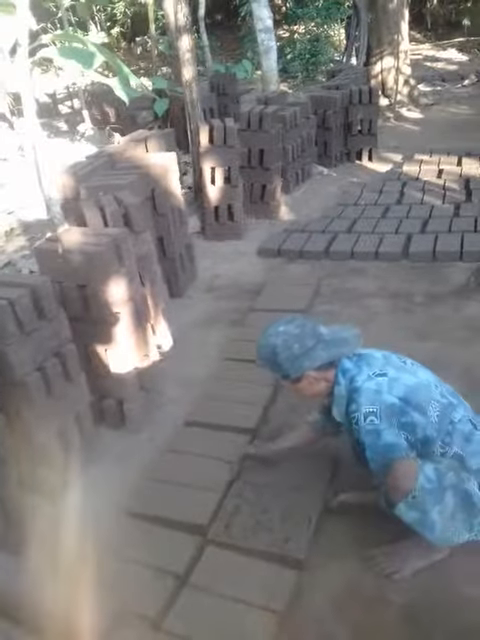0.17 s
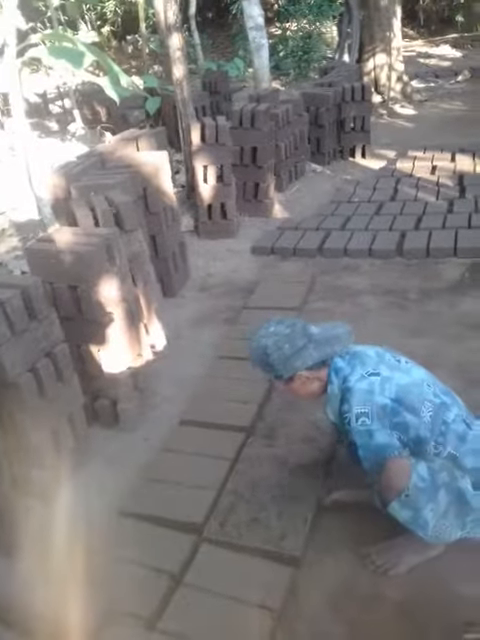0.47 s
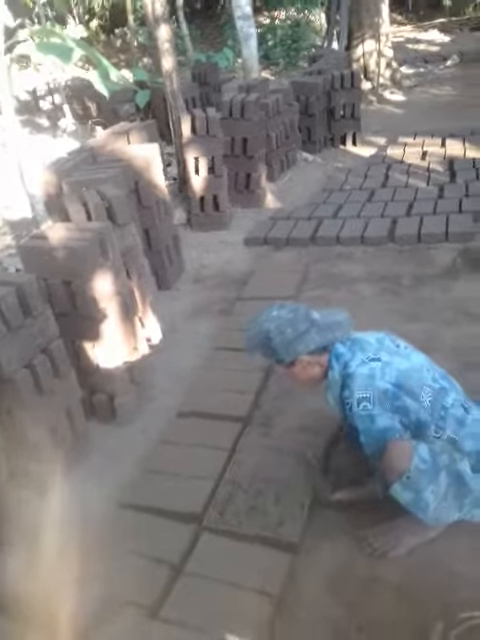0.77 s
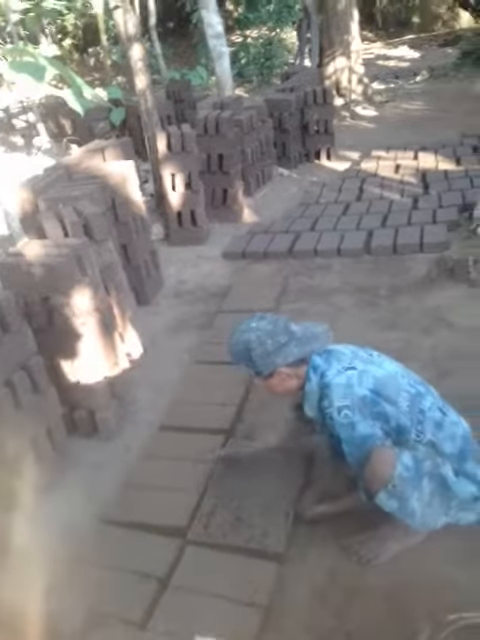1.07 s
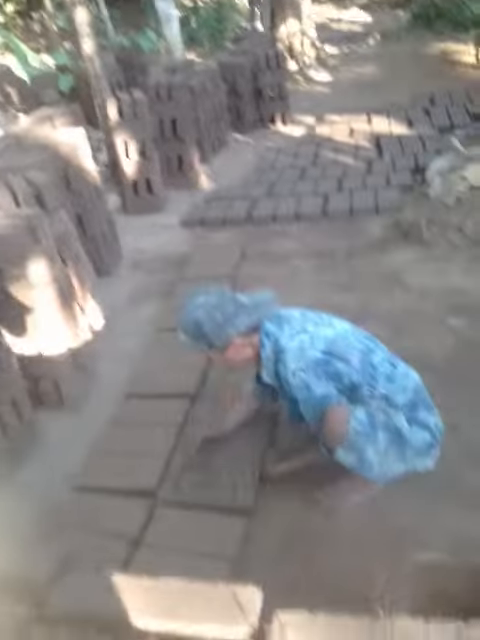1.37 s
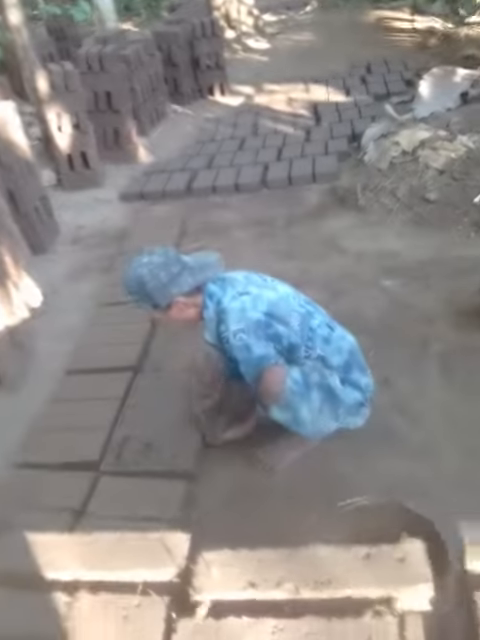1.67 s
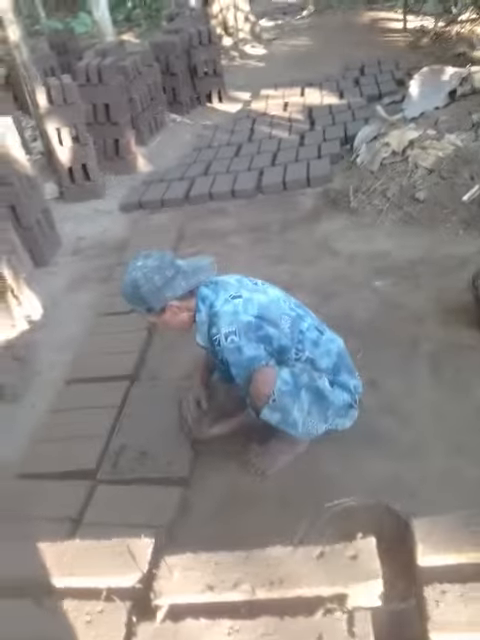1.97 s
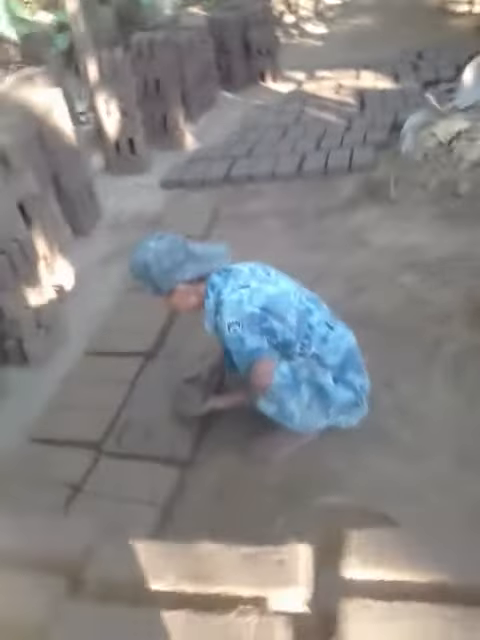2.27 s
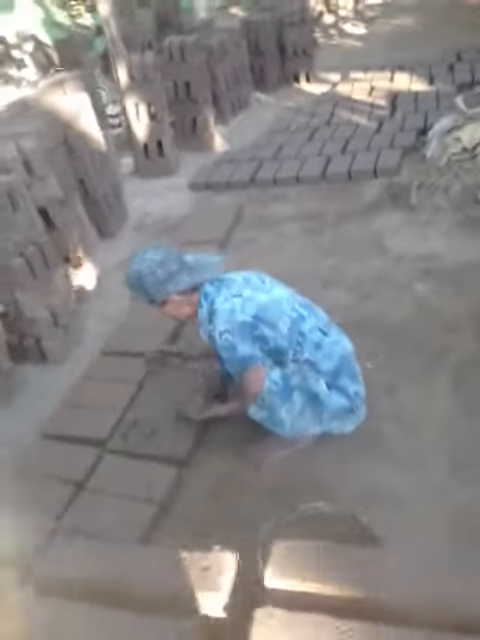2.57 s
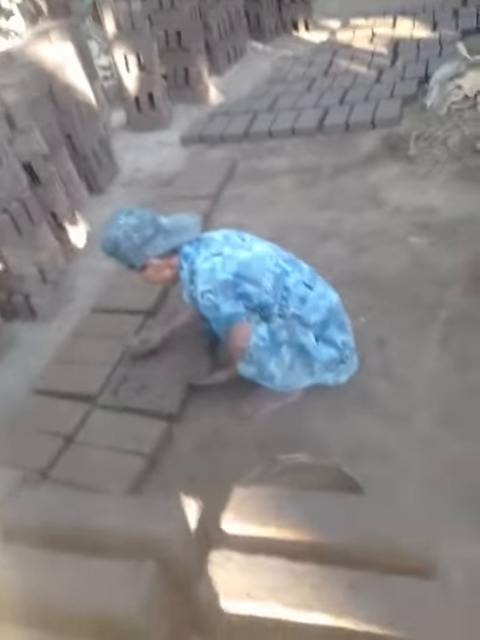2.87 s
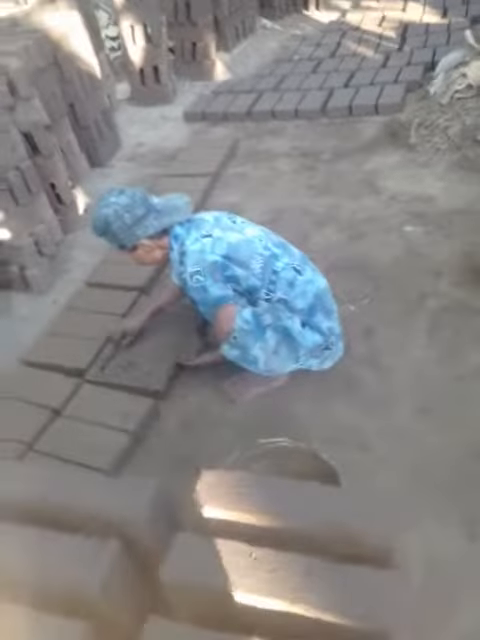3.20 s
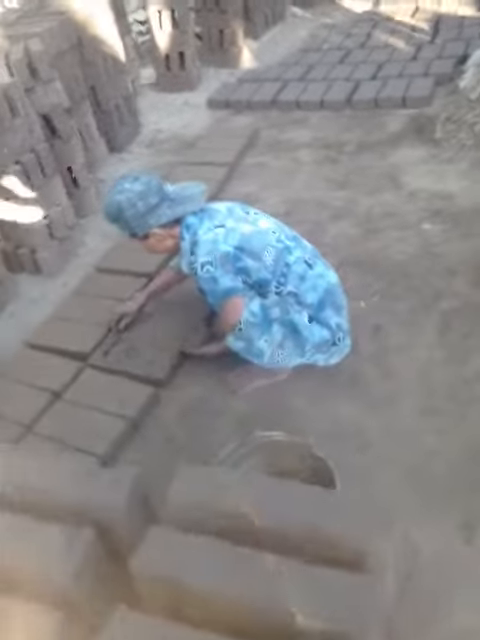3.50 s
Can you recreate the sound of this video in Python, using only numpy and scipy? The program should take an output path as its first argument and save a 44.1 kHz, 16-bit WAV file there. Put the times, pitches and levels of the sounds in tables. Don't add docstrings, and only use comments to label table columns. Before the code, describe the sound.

Wet clay being pressed and scraped by hand, with snaps and ticks, under a steady cicada drone

```python
import sys
import numpy as np
from scipy import signal
from scipy.fft import rfft, irfft, next_fast_len
from scipy.io import wavfile
from scipy.ndimage import map_coordinates

SR = 44100
rng = np.random.default_rng(int(sys.argv[2]) if len(sys.argv) > 2 else 0)


def boost_factor(decibels):
    exponent = np.asarray(decibels, float) / 20
    return 10 ** exponent


def store_wav(level_fs):
    pcm = np.round(np.clip(np.atleast_2d(level_fs), -1, 1) * 32767)
    wavfile.write(sys.argv[1], SR, pcm.T.astype(np.int16))


N = 160524
T = np.arange(N) / SR


def unit(x):
    return x / np.sqrt(np.mean(x ** 2) + 1e-20)


def along(points, hz):
    f, v = np.transpose(points)
    return np.interp(np.log(hz + 1), np.log(f + 1), v)


def curves(rows):
    s, *cols = np.transpose(rows)
    return [np.interp(T, s, c) for c in cols]


def wobble(rate_hz):
    knots = rng.standard_normal(int(T[-1] * 400))
    return map_coordinates(knots, [T * np.clip(rate_hz, .1, 300)])


def filtered(x, response):
    m = next_fast_len(N + SR // 2)
    return irfft(rfft(x, m) * response(np.fft.rfftfreq(m, 1 / SR)), m)[..., :N]


def rings(x, peaks):
    def response(f):
        total = 0
        for k, (centre_hz, width_hz, db) in enumerate(peaks):
            damping = 1j * f * width_hz
            total = total + (-1) ** k * boost_factor(db) * damping / (centre_hz * centre_hz - f * f + damping)
        return total
    return filtered(x, response)


def tinted(x, colour):
    return unit(filtered(x, lambda hz: boost_factor(along(colour, hz))))


def noise():
    return rng.standard_normal(N)


def grit(rate_hz, spread_db):
    hit, sign, size = rng.random((3, N))
    grains = (hit < rate_hz / SR) * np.sign(sign - .5) * boost_factor(-spread_db * np.log(size + 1 / 40))
    return grains + 0.31 * noise()


def swell(start_s, length_s, rise_s, fall_s):
    rise = np.clip((T - start_s) / rise_s, 0, 1)
    return rise * np.exp(-np.clip(T - start_s - length_s, 0, None) / fall_s)


def whistle(start_s, length_s, from_hz, to_hz, level_db):
    u = np.clip((T - start_s) / length_s, 0, 1)
    phase = 2 * np.pi * np.cumsum(from_hz + (to_hz - from_hz) * u) / SR
    return boost_factor(level_db) * np.sin(np.pi * u) ** 0.36 * np.sin(phase)


# start_s, length_s, rub_db, wet_over_rub_db, wood_over_rub_db
STROKE_ROWS = [(0.311, 0.24, -67, -10, -7), (0.54, 0.066, -56, -7.5, -30), (0.623, 0.041, -56, -5.5, -29),
               (0.695, 0.027, -59.5, -4.5, -21), (1.099, 0.34, -76.5, 4, 7.5), (1.443, 0.012, -64.5, 7, 2),
               (1.588, 0.086, -54.5, -3.5, -11), (1.829, 0.11, -95, -14, 24), (2.093, 0.042, -52, -7, -21),
               (2.15, 0.037, -56.5, -1, -19), (2.195, 0.064, -63.5, 1, -22), (2.644, 0.11, -78.5, 0, 15),
               (2.754, 0.1, -68, 1, 10), (2.958, 0.089, -72, -16, 3), (2.912, 0.025, -46, -3, -34),
               (2.973, 0.024, -55.5, 2, -22), (3.027, 0.018, -49, 1, -17), (3.067, 0.014, -51.5, 3.5, -8),
               (3.11, 0.11, -64, 5.5, -14), (3.215, 0.028, -54, -1.5, -14), (3.351, 0.023, -58, 3.5, -7),
               (3.441, 0.01, -45, -5.5, -24), (3.499, 0.1, -47, -5, -14), (3.59, 0.038, -43.5, -5, -10),
               (3.619, 0.058, -38.5, -19, -1.5)]
# start_s, dry_db, wet_db
RUSTLE_CURVE = [(0, -87, -68), (.5, -65.5, -68.5), (1, -69, -64.5), (1.5, -62, -61.5), (1.9, -69.5, -66),
                (2.3, -65.5, -63), (2.75, -70, -62.5), (3.1, -58.5, -55.5), (3.64, -58.5, -59)]
# hz, level_db
RUB_SPECTRUM = [(2500, -44), (4000, -5.5), (6000, -3), (8300, 1.5), (10000, -4.5), (12000, -20),
                (16000, -29)]
# hz, level_db
SMEAR_SPECTRUM = [(200, -9), (450, -0.5), (1200, 2.5), (2200, 0), (3500, -4), (6000, -19.5)]
# centre_hz, width_hz, level_db
MOULD_MODES = [(940, 145, -6.5), (1200, 110, 1.5), (1900, 160, -8)]


def hands():
    shape = np.array([swell(s, n, 0.015, 0.02) for s, n, *_ in STROKE_ROWS])
    rub_db, wet_db, wood_db = np.transpose(STROKE_ROWS)[2:]
    lumps = boost_factor(2.2 * wobble(55) + 1.5 * wobble(150))
    rub = boost_factor(rub_db) @ shape * tinted(grit(2500, 3.9), RUB_SPECTRUM)
    smear = boost_factor(rub_db + wet_db) @ shape * tinted(grit(1500, 3.34), SMEAR_SPECTRUM)
    wood = boost_factor(rub_db + wood_db) @ shape * unit(rings(grit(400, 4), MOULD_MODES))

    dry_db, damp_db = curves(RUSTLE_CURVE)
    crumbs = boost_factor(dry_db + 1.6 * wobble(25.56)) * tinted(grit(160, 4.5), RUB_SPECTRUM)
    damp = boost_factor(damp_db + 2.2 * wobble(17)) * tinted(noise(), SMEAR_SPECTRUM)
    return lumps * (rub + smear) + np.sqrt(lumps) * wood + crumbs + damp


# start_s, fizz_db, thud_db, crack_db
SNAP_ROWS = [(0.4244, -47, -73, -47.5), (0.5521, -40, -56, -55), (0.5701, -38, -60, -44),
             (0.7941, -43.5, -78, -72), (0.8275, -43, -79, -77), (1.0114, -67, -52.5, -43.5),
             (1.4606, -40, -49, -43), (1.5459, -36.5, -42.5, -42), (1.6251, -34.5, -42, -62),
             (1.9824, -37.5, -61, -46), (2.0964, -56, -40.5, -68), (2.1174, -38, -36, -43.5),
             (2.171, -35, -40, -36), (2.3775, -45, -52.5, -58), (2.4409, -51, -55, -53),
             (2.7282, -40.5, -42, -46.5), (2.8025, -23.5, -39, -31.5), (2.9058, -29, -40, -38),
             (2.9317, -28.5, -35, -43), (2.9981, -32.5, -38, -44), (3.4484, -67, -56, -35),
             (3.5134, -39, -41, -53), (3.6154, -32, -32.5, -36), (3.6354, -16.5, -25, -35)]


def snaps():
    parts, t = np.zeros((3, N + SR)), T[:1500]
    t60_s = np.array([[.03], [.022], [.022]])
    attack = np.clip(t / 0.00032, 0, 1) * (1 + 1.15 * np.exp(-t / 0.00042))
    envelope = boost_factor(-60 * t / t60_s) * attack
    draw = rng.standard_normal((len(SNAP_ROWS), 3, len(t)))
    for (s, fizz_db, thud_db, crack_db), z in zip(SNAP_ROWS, draw):
        gains = boost_factor([[thud_db + 1], [crack_db - 1], [fizz_db - 4]])
        parts[:, round(s * SR):][:, :len(t)] += gains * z * np.abs(z) * envelope
    thud, crack, fizz = parts[:, :N]

    def twice(x, peaks):
        return rings(rings(x, peaks), peaks)

    out = 1.04 * twice(thud, [(1400, 2450, 0.0015)])
    out += 0.78 * twice(crack, [(5300, 4200, 0.006)])
    out += 0.92 * twice(fizz, [(8800, 3230, 0)])
    return out + 0.2 * rings(fizz, [(14000, 19000, 0.004)])


def ring_clusters(table, spread, floor_hz, t60_s, rise_s):
    out, t = np.zeros(N + SR), T[:2000]
    for (s, hz, db), z in zip(table, rng.standard_normal((len(table), 9))):
        ring = 0
        for place, k in zip(np.linspace(-1.5, 1.5, len(z)), z):
            ring_hz = hz + (spread * hz + floor_hz) * (place + k / 4)
            ring = ring + np.exp(-place ** 2 / 2) * np.sin(2 * np.pi * (ring_hz * t + k))
        out[round(s * SR):][:len(t)] += boost_factor(db - 7 - 60 * t / t60_s) * (1 - np.exp(-t / rise_s)) * ring
    return out[:N]


# start_s, pitch_hz, level_db
KNOCK_ROWS = [(.727, 647, -37.5), (1.122, 1900, -40.5), (1.2, 1950, -38), (1.215, 690, -37),
              (1.383, 2870, -40.5), (1.402, 9300, -25), (0.642, 1360, -46.5), (.735, 1980, -46),
              (1.465, 1050, -29), (1.637, 1280, -38), (1.672, 1120, -36), (1.842, 2493, -45),
              (2.116, 1900, -24), (2.42, 3260, -44.5), (2.904, 520, -35), (2.932, 544, -32),
              (2.944, 510, -33.5), (3.084, 1200, -40), (3.375, 1400, -30), (3.447, 1890, -36)]


def knocks():
    return ring_clusters(KNOCK_ROWS, 0.057, 196, t60_s=0.018, rise_s=0.0022)


# start_s, pitch_hz, level_db
TICK_ROWS = [(.352, 10200, -56), (.402, 8600, -50), (.452, 8600, -50), (.578, 2280, -45.5),
             (.632, 5400, -50), (.655, 6200, -49), (.722, 8850, -42), (.757, 9600, -57), (1.128, 8800, -52),
             (1.203, 5500, -50), (1.232, 3020, -46), (1.236, 7000, -56), (1.275, 3980, -60),
             (1.297, 1980, -49), (1.3, 10300, -52), (1.385, 9500, -51), (1.404, 4500, -54),
             (1.433, 8500, -53), (1.448, 6000, -46), (1.449, 10200, -54), (1.528, 8600, -45),
             (1.596, 2000, -42), (1.61, 8800, -44), (1.705, 9900, -50), (1.803, 9650, -55),
             (1.842, 8600, -50), (1.862, 9600, -51), (1.88, 10600, -56), (1.896, 9500, -50),
             (1.992, 3500, -50.5), (2.025, 10000, -58), (2.098, 2400, -37), (2.195, 2040, -40),
             (2.42, 6540, -52), (2.502, 2550, -55), (2.742, 7000, -49), (2.896, 10200, -51),
             (3.028, 2270, -39), (3.04, 9000, -42), (3.074, 9400, -35.5), (3.092, 3000, -37.5),
             (3.11, 5900, -46), (3.236, 9500, -46), (3.389, 6000, -48), (3.407, 9000, -54),
             (3.468, 2820, -44), (3.468, 6500, -45), (3.525, 9900, -37), (3.593, 9400, -34)]


def ticks():
    return ring_clusters(TICK_ROWS, 0.122, 180, t60_s=0.016, rise_s=0.0003)


# start_s, length_s, from_hz, to_hz, level_db
SQUELCH_ROWS = [
    (.18, 0.064, 900, 1200, -61.5),
    (.705, 0.053, 600, 703, -58.5),
    (0.698, 0.041, 1800, 2010, -57.5),
    (1.182, .075, 645, 1015, -57),
    (2.671, 0.046, 712, 885, -56.5),
    (2.764, 0.088, 1000, 1200, -53.5),
    (2.989, 0.086, 894, 1055, -51.5),
    (3.052, 0.056, 1200, 1144, -48.5),
    (3.357, 0.041, 1100, 1600, -48.5),
    (3.45, 0.024, 1650, 2117, -45),
]


def squelches():
    rough = unit(rings(grit(310, 3.4), [(1, 250, 0)]))
    return rough * sum(whistle(*row) for row in SQUELCH_ROWS)


# start_s, level_db, near_share (0-1)
CHORUS_CURVE = [(0, -62.5, 0.4), (.75, -58.5, 0.4), (1.2, -59.5, 0.17), (1.9, -60, 0), (2.25, -56.5, 0.16),
                (3, -57, 0.02), (3.64, -58, 0.8)]
# centre_hz, width_hz, level_db
FAR_CHORUS_BANDS = [(7845, 150, -5.5), (7145, 350, -14.5)]
# centre_hz, width_hz, level_db
CRICKET_BANDS = [
    (5794, 230, -75),
    (8950, 260, -79),
    (4500, 550, -78),
]
# centre_hz, width_hz, level_db
HIGH_CRICKET_BAND = (13700, 90, -89)


def insects():
    level_db, share = curves(CHORUS_CURVE)
    share = np.clip(share, 0, 1)
    buckles_hz = 235.4 * (1 + 0.0029 * wobble(2.67))
    beat = np.sin(np.pi * np.cumsum(buckles_hz) / SR)
    sides = np.where(beat > 0, 1, 0.21)
    gate = np.abs(beat) ** 1.7 * sides * boost_factor(3.1 * wobble(110))
    tymbal_hz = 7720 + 29.8 * wobble(140)
    near = unit(gate * np.sin(2 * np.pi * np.cumsum(tymbal_hz) / SR))
    far = unit(rings(rings(noise(), FAR_CHORUS_BANDS), [(7300, 2900, 0)]))
    out = boost_factor(level_db + 1.0 + 0.2 * wobble(6.64)) * (np.sqrt(share) * near + np.sqrt(1 - share) * far)

    for hz, width_hz, db in CRICKET_BANDS + [HIGH_CRICKET_BAND]:
        band = [(hz, width_hz, 0)]
        song = unit(rings(rings(noise(), band), band))
        out += boost_factor(db + 0.44 * wobble(10.0) + 2.0 * wobble(55)) * song
    return out


# start_s, level_db, lower_over_upper_half_db
CALL_ROWS = [
    (-.2, -62, -2.5),
    (0.266, -65, -1),
    (0.888, -63.5, 0),
    (1.532, -63, -5),
    (2.013, -63, -8),
    (2.447, -62, -2),
    (3.062, -61.5, -6),
    (3.455, -61, -8),
]
# start_s, pitch_hz, level_db
CALL_GLIDE = [(-.022, 5650, -19), (.008, 5210, -6), (.04, 4810, 2), (.068, 4350, 2), (.076, 4100, -6),
              (.086, 3700, -7), (0.095, 3450, 1), (.122, 3050, 1.5), (0.165, 2550, -9)]
# start_s, length_s, from_hz, to_hz, level_db
CHIP_ROWS = [
    (1.232, 0.043, 9300, 10500, -78),
    (1.279, 0.1, 10600, 9150, -69),
    (1.486, 0.023, 3300, 2800, -62),
    (1.797, 0.023, 3290, 2800, -62),
    (2.372, 0.026, 3310, 2815, -60.5),
]


def birds():
    at_s, pitch_hz, level_db = np.transpose(CALL_GLIDE)
    far, early_s = 0, np.arange(-SR // 2, N) / SR
    warble_hz = 80 * np.resize(wobble(250), len(early_s))
    for s, db, low_db in CALL_ROWS:
        u = early_s - s
        call_db = db + np.interp(u, at_s, level_db) + low_db * (u > at_s[4])
        gain = (u > at_s[0]) * (u < at_s[-1]) * boost_factor(call_db)
        far = far + gain * np.sin(2 * np.pi * np.cumsum(np.interp(u, at_s, pitch_hz) + warble_hz) / SR)

    trees_t60_s, trees_db = 0.56, 9.5
    t = T[:SR // 2]
    tail = rng.standard_normal(len(t)) * boost_factor(-60 * t / trees_t60_s)
    tail = tail / np.linalg.norm(tail)

    def echo(x):
        return signal.fftconvolve(x, tail)[:len(x)]

    near = sum(whistle(*row) for row in CHIP_ROWS)
    return (0.15 * far + boost_factor(trees_db) * echo(far))[-N:] + near + 0.23 * echo(near)


# hz, density_db_per_hz
YARD_SPECTRUM = [(20, -16), (50, -20), (85, 4.5), (150, 3.5), (450, -3.5), (900, -15.5), (4500, -50),
                 (9000, -78), (16000, -59)]


def yard():
    return boost_factor(-63 + 0.8 * wobble(6.34)) * tinted(noise(), YARD_SPECTRUM)


# hz, density_db_per_hz
PORT_SPECTRUM = [(40, -17), (125, 1), (1000, -5), (3500, -9), (13000, -18.5)]


def port_hiss():
    return boost_factor(-73.5) * tinted(noise(), PORT_SPECTRUM)


def scene():
    clay = hands() + snaps() + knocks() + ticks() + squelches()
    mid = clay + insects() + birds() + yard()
    side = port_hiss()
    return np.array([mid + side, mid - side])


def low_pass(x):
    return signal.sosfilt(signal.butter(12, 16390, fs=SR, output="sos"), x)


def record(dry):
    top_hz, offset = 15830, -.0006
    mix = filtered(dry, lambda hz: hz < top_hz) + offset
    return low_pass(mix)


dry = scene()
out = record(dry)
store_wav(out)
```